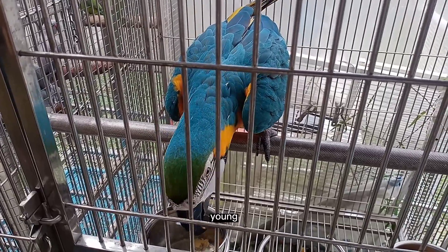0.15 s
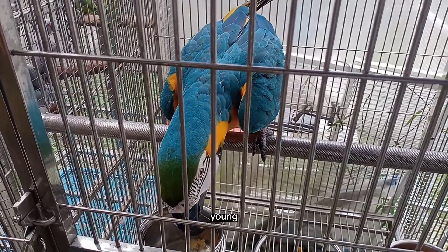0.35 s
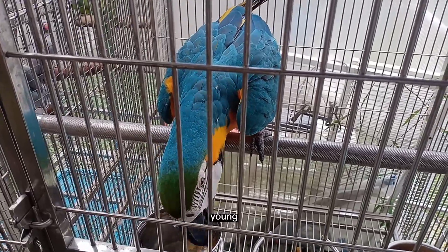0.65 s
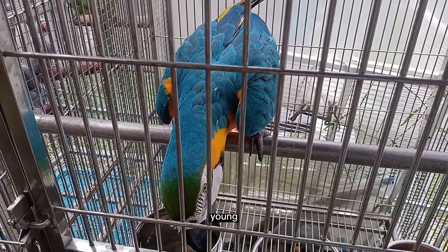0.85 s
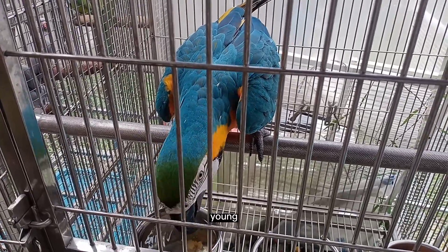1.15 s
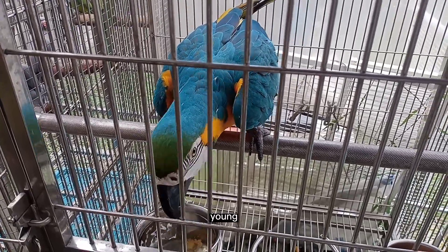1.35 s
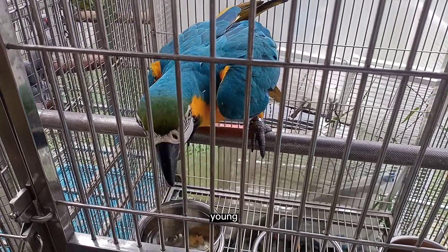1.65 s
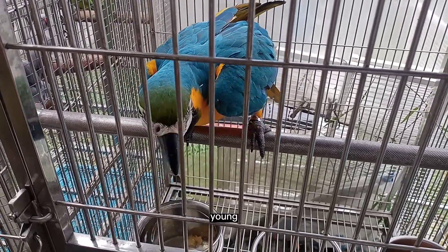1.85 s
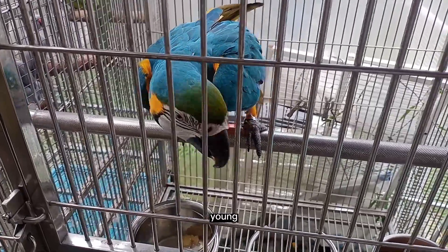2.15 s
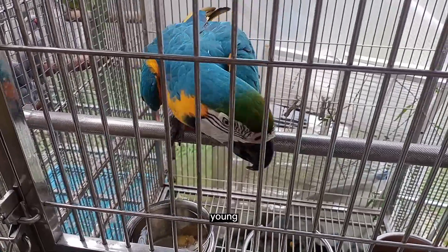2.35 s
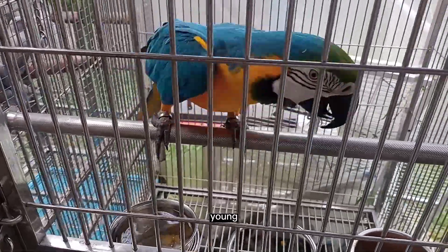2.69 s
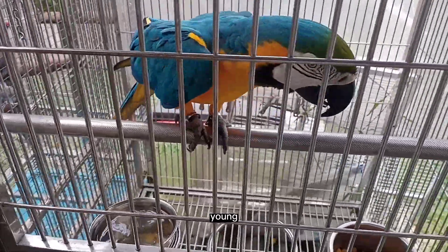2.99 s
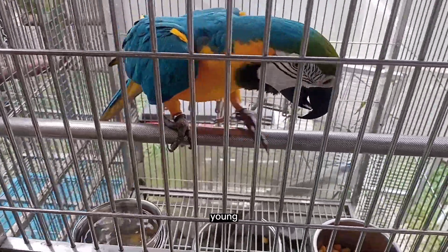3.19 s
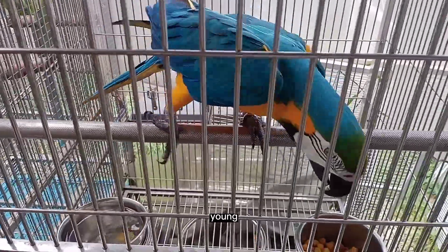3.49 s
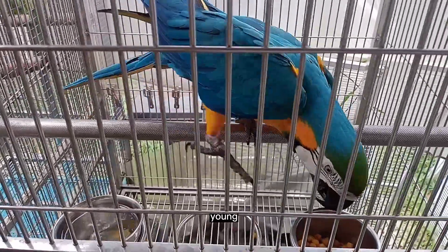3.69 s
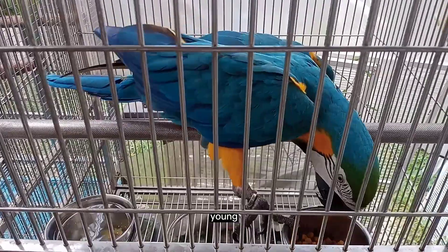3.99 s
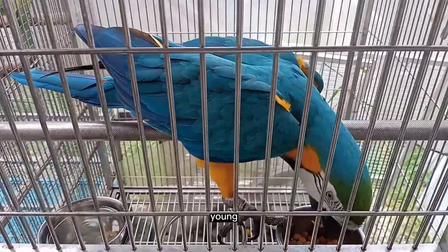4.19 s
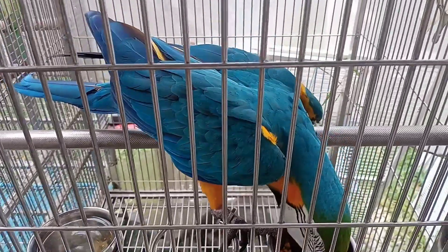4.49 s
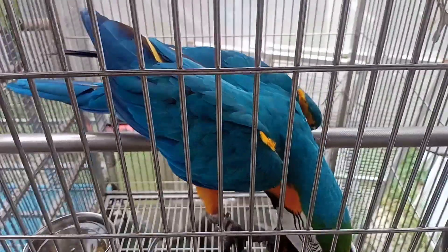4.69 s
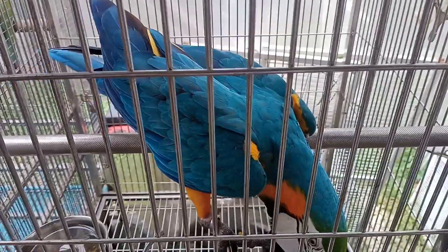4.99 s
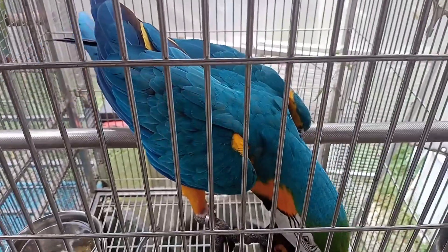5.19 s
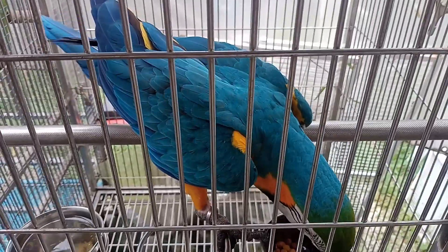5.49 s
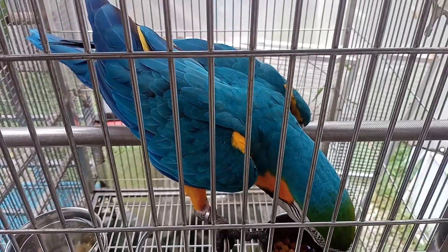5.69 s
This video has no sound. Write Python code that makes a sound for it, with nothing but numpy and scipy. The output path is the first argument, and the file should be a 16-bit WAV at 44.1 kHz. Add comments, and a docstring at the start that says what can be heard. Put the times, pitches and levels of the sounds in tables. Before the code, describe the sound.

Five piercing, hoarse-edged parrot squawks ring in a reverberant room, followed by faint croaks, claws tinking on cage bars and a two-burst rattling screech.

```python
"""Inside a hard-walled room, a macaw in a steel cage: the microphone hears the room almost as strongly as the bird.
A restless background and a low hum come first; then five squawks, each a clear whistle over a lower,
hoarse voice that rises into it and tumbles out of it. After a soft mutter the hum stops; more mutters follow
as claws ring the cage steel, the bird shifting along its perch. Last comes a rattling call in two parts,
its voice chopped into bursts, the second part turning clear an octave up. The background carries on to the end."""
import sys
import numpy as np
from scipy import signal
from scipy.fft import rfft, irfft, next_fast_len
from scipy.io import wavfile
from scipy.ndimage import map_coordinates

SR = 44100
rng = np.random.default_rng(int(sys.argv[2]) if len(sys.argv) > 2 else 0)


def pcm_store(signal):
    """Save signal as 16-bit PCM."""
    levels = np.round(np.clip(np.atleast_2d(signal), -1, 1) * 32767)
    wavfile.write(sys.argv[1], SR, levels.astype(np.int16).T)


N = 257720
T = np.arange(N) / SR
TOP_HZ = 15600  # nothing is kept above this

# Background level over time. Each row: time in seconds, level in dB.
BACKGROUND_LEVEL = [(0.0, -54), (0.31, -57), (0.34, -66.5), (1.38, -62), (1.54, -64.5), (2.8, -62),
                    (2.9, -71.5), (3.19, -64), (3.43, -66), (3.46, -59), (4.02, -59), (4.09, -63.5),
                    (4.73, -56.5), (5.78, -55.5)]
# Hiss level over time. Each row: time in seconds, level in dB.
HISS_LEVEL = [(0, -58.5), (.3, -69.5), (2.2, -74), (2.8, -77.5), (3.8, -71), (4.9, -67.5), (5.4, -71.5),
              (5.84, -64.5)]
# Colour of the low rumble. Each row: frequency in Hz, relative level in dB.
RUMBLE_SPECTRUM = [(25, -21), (50, -19), (85, -1.5), (130, -3.5), (300, -0.5), (500, -5), (700, -14),
                   (1500, -34.5)]
# Colour of the softer rush. Each row: frequency in Hz, relative level in dB.
RUSH_SPECTRUM = [(300, -35), (700, 2.5), (1500, 0.5), (2600, -0.5), (3800, -4), (4500, -29), (8000, -27)]
# Colour of the hiss. Each row: frequency in Hz, relative level in dB.
HISS_SPECTRUM = [(2000, -41), (4200, 5), (5200, -0.5), (7300, 10.5), (10000, -2.5), (12000, -12),
                 (15000, -1.5)]
# Tones of the hum. Each row: frequency in Hz, rms level in dB.
HUM_TONES = [(53.8, -69), (107.7, -71.5)]
# Reverberation of the room. Each row: frequency in Hz, time to fall 60 dB in seconds.
ROOM_DECAY = [(500, 0.75), (2000, 0.89), (3700, 0.6), (7500, 0.47), (14000, 0.39)]
# Claws on the cage. Each row: start in seconds, relative strength in dB.
CLAW_TAPS = [(2.3987, -54.5), (2.974, -41.5), (2.9844, -37.5), (3.3513, -29), (3.6566, -50)]
# Ringing modes of the cage. Each row: frequency in Hz, relative level in dB, time to fall 60 dB in seconds.
STEEL_MODES = [(1730, -9.5, 0.6), (2620, -3.5, 0.62), (2625, -18, 0.67), (3547, -8.5, 0.37),
               (3610, -4, 0.29), (4660, -11, 0.28), (6340, 5.5, 0.1), (6660, -20, 0.31), (7617, -7, 0.41),
               (8320, 1, 0.27), (11500, -23, 0.26), (12890, -8, 0.14), (13400, -1.5, 0.15),
               (13800, -6.5, .25)]
# Throat and open beak. Each row: frequency in Hz, gain in dB.
OPEN_THROAT = [(500, -79), (1550, -21), (2000, -15.5), (2500, -8.5), (2900, -4), (3400, 3), (4000, -2.5),
               (4250, -13), (4550, -16.5), (5150, -14), (6000, -16.5), (7400, -10), (9500, -16.5),
               (12500, -37.5), (14000, -24), (15500, -42)]
# Throat with the beak wide open. Each row: frequency in Hz, gain in dB.
WIDE_OPEN_THROAT = [(500, -102), (1300, -10), (2050, -12.5), (2500, -4.5), (3200, 1.5), (4100, 1.5),
                    (4600, -13.5), (6200, -3), (8200, 1), (8800, -13), (10200, -8), (12400, -25),
                    (13800, -20), (15500, -30)]
# Throat with the beak nearly closed. Each row: frequency in Hz, gain in dB.
NEARLY_CLOSED_THROAT = [(500, -32), (1300, -3), (1800, -1), (2700, 4), (3800, 2), (4800, -12), (8500, -9),
                        (11000, -30), (15000, -28)]
# Soft mutters. Each row: start in seconds, length in seconds, first pitch in Hz, last pitch in Hz,
# relative level in dB, roughness 0-1.
MUTTER_CALLS = [(1.908, 0.17, 1371, 1155, -49.5, 0.92), (2.516, 0.064, 890, 807, -61.5, 0.9),
                (2.845, 0.025, 1400, 1315, -51.5, 0.5), (2.901, 0.042, 1082, 921, -49.5, 0.7)]
# Rattling calls. Each row: start in seconds, end in seconds, low-register pitch in Hz, share of the pitch
# lost by the end, relative level in dB, swell in dB, attack in seconds, release in seconds,
# flap rate in Hz, clearness of the later part 0-1.
RATTLE_CALLS = [(3.973, 4.175, 1176, .135, -32.5, 1.5, 0.019, 0.033, 69.87, 0.04),
                (4.322, 4.526, 1020, .035, -31.5, -2.5, 0.003, .014, 63.7, 0.98)]
# Squawks. Each row: start, whistle start, whistle break and end in seconds, whistle pitch in Hz,
# relative onset, whistle and fall levels in dB, whistle roughness 0-1.
SQUAWK_CALLS = [(0.307, 0.336, 0.38, 0.49, 4114, -28, -28, -28.5, 0.21),
                (0.566, 0.603, 0.64, .72, 3800, -33.5, -28.5, -29, 0.09),
                (0.882, .921, 0.96, 1.03, 3746, -35.5, -27, -31, 0.02),
                (1.389, 1.434, 1.463, 1.54, 3707, -34.5, -29, -30.5, 0.2),
                (1.698, 1.743, 1.76, 1.855, 3592, -36.5, -27.2, -32, 0.15)]

# rumble over the background level; mean level of the rush; the rush's share of the background's swings
RUMBLE_DB, RUSH_DB, RUSH_FOLLOWS = 0.14, -61, 0.85

DEPTH_START, DEPTH_END = 0.84, 0.44  # rattle depth 0-1: the bursts run together as the call goes on
ROUGH_START, ROUGH_END = 1.05, 0.516  # roughness eases too
RATTLE_EDGE_DB = 12  # depth of attack and release
BEAK_OPENS_S = 0.088  # from open to wide open
# when and how fast the voice jumps an octave to a clear tone, and leaves it
CLEAR_AFTER_S, CLEAR_BUILD_S, CLEAR_FADE_S = 0.0536, 0.045, 0.027
# the clear tone is louder, loses this share of roughness, and the beak narrows by this share
CLEAR_DB, CLEAR_SMOOTHS, CLEAR_SHUTS = 3, 0.652, 0.74

# squawk pitches are shares of the whistle pitch
UPPER_RISE, UPPER_SAG, UPPER_DROP = 0.18, 0.018, 0.065  # climb, sag while it holds, drop after the break
LOWER_BOTTOM, LOWER_TOP = 0.41, 0.72  # range of the lower voice
SQUAWK_ATTACK_S, SQUAWK_ATTACK_DB = 0.016, 14  # swell at the start
SWITCH_S, TUMBLE_S = 0.0074, 0.06  # change between hoarse and clear; fall of the lower voice
TUMBLE_CURVE = 1.5  # the fall gathers speed
RASP_AFTER_S, RASP_BUILD_S = 0.038, 0.019  # after the break both voices turn to a rasp
UPPER_FALL_DB, UPPER_RASP_DB = -5, -7  # upper voice in the tumble and the rasp, over the fall level
# lower voice over the level of each phase
LOWER_ONSET_DB, LOWER_HOLD_DB, LOWER_FALL_DB, LOWER_RASP_DB = 0.5, -37, -2.5, -5.5
ONSET_ROUGH, TUMBLE_ROUGH, RASP_ROUGH = 0.854, 0.376, 0.98  # roughness 0-1
BREATH = 0.93  # escaping air, which grows with roughness


def amp(db):
    """Decibels to gain."""
    return 10 ** (np.asarray(db) / 20)


def unit(x):
    """Scale to rms 1."""
    return x / np.sqrt(np.mean(x ** 2) + 1e-20)


def ramp(x):
    """0 below 0, 1 above 1, straight between."""
    return np.clip(x, 0, 1)


def blend(a, b, share):
    """From a at share 0 to b at share 1."""
    return a + (b - a) * share


def along(points, hz):
    """Read (Hz, value) points on a log frequency axis."""
    f, v = np.transpose(points)
    return np.interp(np.log(hz + 1), np.log(f), v)


def level_curve(points):
    """Read (seconds, dB) points at every sample."""
    seconds, db = np.transpose(points)
    return np.interp(T, seconds, db)


def wobble(rate, t):
    """A smooth random curve, rate knots a second."""
    return map_coordinates(rng.standard_normal(8192), [(t - t[0]) * rate], mode="mirror")


def filtered(x, response):
    """x times a response of frequency."""
    m = next_fast_len(N + 8192)
    hz = np.fft.rfftfreq(m, 1 / SR)
    return irfft(rfft(x, m) * response(hz), m)[:N]


def coloured(x, spectrum):
    """x through a (Hz, dB) spectrum."""
    return filtered(x, lambda hz: amp(along(spectrum, hz)))


def coloured_noise(spectrum):
    """Noise of rms 1 with a (Hz, dB) spectrum."""
    return unit(coloured(rng.standard_normal(N), spectrum))


def during(start, end):
    """Sample indices of a stretch of time."""
    return np.flatnonzero((T >= start) & (T < end))


def background():
    """Restless rumble, a softer rush that swells with it, hiss, and a low hum that cuts out."""
    level_db = level_curve(BACKGROUND_LEVEL)
    rumble_db = level_db + RUMBLE_DB + 2.0 * wobble(26, T)
    rumble = amp(rumble_db) * coloured_noise(RUMBLE_SPECTRUM)
    rush_db = RUSH_DB + RUSH_FOLLOWS * (level_db - level_db.mean()) + 1.7 * wobble(22.066, T)
    rush = amp(rush_db) * coloured_noise(RUSH_SPECTRUM)
    hiss = amp(level_curve(HISS_LEVEL)) * coloured_noise(HISS_SPECTRUM)
    hum = sum(amp(db) * np.sqrt(2) * np.sin(2 * np.pi * hz * T) for hz, db in HUM_TONES)
    hum_gate = ramp((2.1 - T) / 0.044)  # silent from 2.1 s
    return rumble + rush + hiss + hum * hum_gate


def room(x, wet_db, build=0.0014, far_wall=0.0895, far_wall_db=-14):
    """A diffuse tail that builds up and dies by band, with one more swell from the far wall (times in s)."""
    hz, t, z = signal.stft(rng.standard_normal(SR), SR, nperseg=256)
    decay = amp(-60 * t / along(ROOM_DECAY, hz)[:, None])
    tail = signal.istft(z * decay, SR, nperseg=256)[1]
    t = np.arange(len(tail)) / SR
    tail = tail * (1 - np.exp(-t / build))
    slap = rng.standard_normal(len(t)) * np.exp(-((t - far_wall) / 0.0062) ** 2)
    response = tail / np.linalg.norm(tail) + amp(far_wall_db) * slap / np.linalg.norm(slap)
    return x + amp(wet_db) * signal.fftconvolve(x, response)[:N]


def cage():
    """Each claw tap is a short bright scrape and a ring of the steel's decaying modes."""
    ring, scrape = np.zeros(N), np.zeros(N)
    for start, db in CLAW_TAPS:
        i = during(start, start + 1)
        t = T[i] - start
        for hz, level, t60 in STEEL_MODES:
            # every tap excites the modes a little differently
            mode_db = level + 2 * rng.standard_normal() - 60 * t / t60
            ring[i] += amp(db - 21.5) * amp(mode_db) * np.sin(2 * np.pi * hz * t)
        scrape[i] += amp(db - 7.5 - 60 * t / 0.093) * rng.standard_normal(len(t))
    scrape_spectrum = [(500, -22), (2500, -6.0), (5000, -4.5), (7300, 7.5), (10500, -7), (14000, -8)]
    return ring + coloured(scrape, scrape_spectrum)


def syrinx(t, pitch, low, rough, order, jitter=0.0421, flutter=0.0049, breath=0.87, scatter=1.0):
    """Membrane harmonics; as the low register fades only every order-th one is left."""
    rough, low = ramp(rough), ramp(low)
    hz = pitch * (1 + jitter * rough * wobble(700, t) + flutter * wobble(152.0, t))
    phase = 2 * np.pi * np.cumsum(hz) / SR
    k = np.arange(1, 25)[:, None]  # harmonic numbers
    # an irregular membrane lets each harmonic slip in phase on its own
    wander = np.array([wobble(447.2, t) for _ in k])
    slip = rng.uniform(0, 2 * np.pi, k.shape) + scatter * rough * wander
    weight = np.where(k % order == 0, 1, low) * (k * hz < TOP_HZ)
    harmonics = np.sum(weight * np.sin(k * phase + slip), axis=0)
    tone = np.sqrt(2) * harmonics / np.sqrt(1 + low ** 2)
    # turbulent air, strongest once a cycle
    air = rng.standard_normal(len(t)) * (1 + np.cos(phase) / 2) * np.sqrt(8)
    fade = ramp(np.minimum(t - t[0], t[-1] - t) / 0.00048)
    return fade * (tone * np.sqrt(1 - rough ** 2 / 2) + breath * rough * air)


def mutters():
    """Quiet falling croaks through a nearly closed beak."""
    out = np.zeros(N)
    for start, length, first_hz, last_hz, db, rough in MUTTER_CALLS:
        i = during(start, start + length)
        swell = np.sqrt(np.hanning(len(i)))
        pitch = np.linspace(first_hz, last_hz, len(i))
        out[i] += amp(db - 6) * swell * syrinx(T[i], pitch, 0.99, rough, order=1)
    return coloured(out, NEARLY_CLOSED_THROAT)


def rattles(swing=0.095, gap_db=19, stray=0.049):
    """A slow flap chops the voice into bursts, each sliding up in pitch; the beak opens and brightens it."""
    out, beak = np.zeros(N), np.zeros(N)
    for start, end, hz, sag, db, swell_db, attack, release, rate_hz, clearness in RATTLE_CALLS:
        i = during(start, end)
        age, left = T[i] - start, end - T[i]
        progress = age / (end - start)
        clear = ramp(clearness) * ramp((age - CLEAR_AFTER_S) / CLEAR_BUILD_S) * ramp(left / CLEAR_FADE_S)
        rough = blend(ROUGH_START, ROUGH_END, progress) * (1 - CLEAR_SMOOTHS * clear)
        depth = blend(DEPTH_START, DEPTH_END, progress)
        edge_db = RATTLE_EDGE_DB * (ramp(age / attack) * ramp(left / release) - 1)
        level_db = db + swell_db * progress + CLEAR_DB * clear + edge_db
        cycle = age * rate_hz % 1
        opening = np.sin(np.pi * cycle ** 0.36)
        # rough bursts each land on a pitch of their own
        burst_bend = swing * depth * (cycle - 0.5) + stray * rough * wobble(rate_hz, T[i])
        pitch = hz * (1 - sag * progress) * (1 + burst_bend)
        # with every second harmonic left, the clear tone is an octave up
        voice = syrinx(T[i], pitch, 1 - clear, rough, order=2, breath=0.35)
        out[i] = amp(level_db + gap_db * depth * (opening - 1)) * voice
        beak[i] = ramp(age / BEAK_OPENS_S) * (1 - CLEAR_SHUTS * clear)
    return coloured(out * beak, WIDE_OPEN_THROAT) + coloured(out * (1 - beak), OPEN_THROAT)


def squawks():
    """Two voices: the lower sinks far under the held whistle, then returns and tumbles down into a rasp."""
    out = np.zeros(N)
    for start, lock, split, end, hz, onset_db, whistle_db, fall_db, whistle_rough in SQUAWK_CALLS:
        i = during(start, end)
        t = T[i]
        rise = ramp((t - start) / (lock - start))
        hold = ramp((t - lock) / (split - lock))
        tumble = ramp((t - split) / TUMBLE_S)
        locked = ramp((t - lock) / SWITCH_S + 0.5)
        broken = ramp((t - split) / SWITCH_S + 0.5)
        rasp = ramp((t - split - RASP_AFTER_S) / RASP_BUILD_S)

        def by_phase(onset, whistle, fall, tail):
            """A value that moves through the four phases of the squawk."""
            until_break = blend(onset, whistle, locked)
            return blend(blend(until_break, fall, broken), tail, rasp)

        attack_db = SQUAWK_ATTACK_DB * (ramp((t - start) / SQUAWK_ATTACK_S) - 1)
        upper_db = attack_db + by_phase(
            onset_db, whistle_db, fall_db + UPPER_FALL_DB, fall_db + UPPER_RASP_DB)
        lower_db = attack_db + by_phase(
            onset_db + LOWER_ONSET_DB, whistle_db + LOWER_HOLD_DB,
            fall_db + LOWER_FALL_DB, fall_db + LOWER_RASP_DB)
        rough = by_phase(ONSET_ROUGH, whistle_rough, TUMBLE_ROUGH, RASP_ROUGH)
        upper = 1 - UPPER_RISE * (1 - rise) - UPPER_SAG * hold ** 2 - UPPER_DROP * np.sqrt(tumble)
        lower = blend(LOWER_BOTTOM, LOWER_TOP, rise - tumble ** TUMBLE_CURVE)
        # the upper voice's strength shakes, more in a rougher whistle
        quaver_db = 5 * np.sqrt(abs(whistle_rough)) * wobble(138.5, t)
        breath = BREATH * rough
        upper_voice = syrinx(t, hz * upper, 0, rough, order=1, breath=breath)
        lower_voice = syrinx(t, hz * lower, 0, rough + 0.083, order=1, jitter=0.0568, breath=breath)
        out[i] += amp(upper_db + quaver_db) * upper_voice + amp(lower_db) * lower_voice
    return coloured(out, OPEN_THROAT)


def scene():
    """Bird and cage sound in the room, over the background."""
    quiet = room(mutters() + cage(), wet_db=-2.5)
    calls = amp(-0.5) * room(rattles(), wet_db=-3.5) + amp(-3.5) * room(squawks(), wet_db=-2)
    return (background() + quiet + calls)[None]


def record(dry):
    """One microphone channel, with nothing kept above the band limit."""
    return filtered(dry[0], lambda hz: hz < TOP_HZ)[None]


dry = scene()
out = record(dry)
pcm_store(out)
```